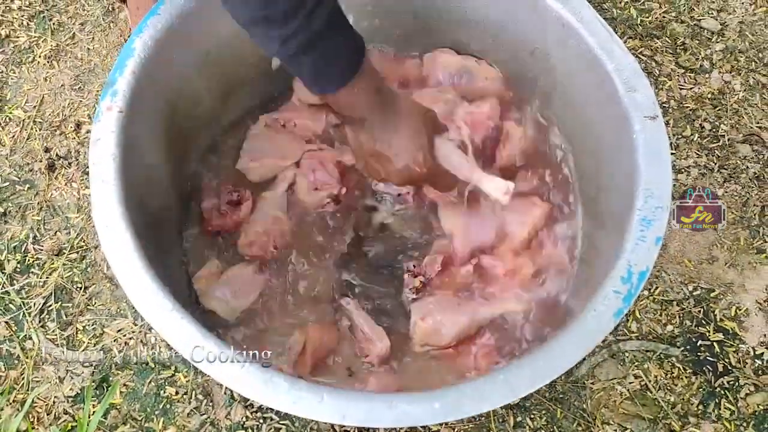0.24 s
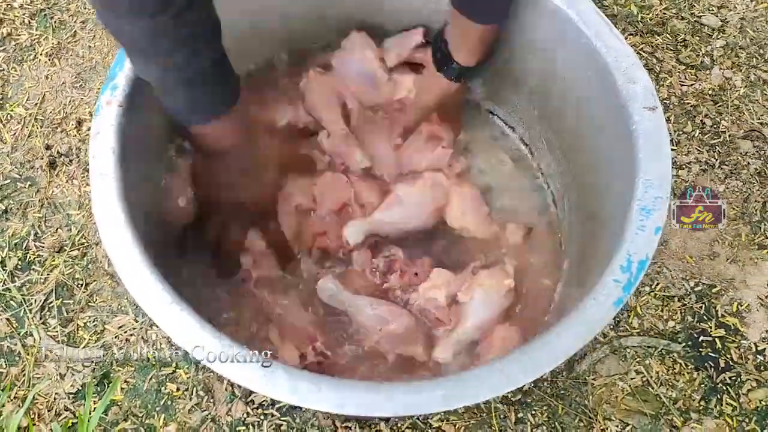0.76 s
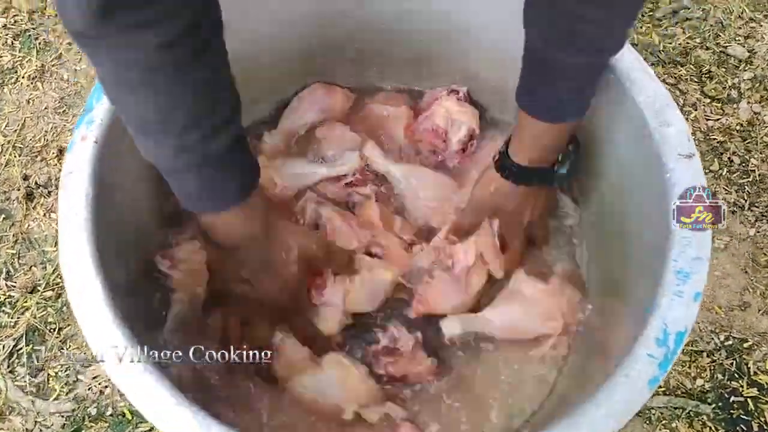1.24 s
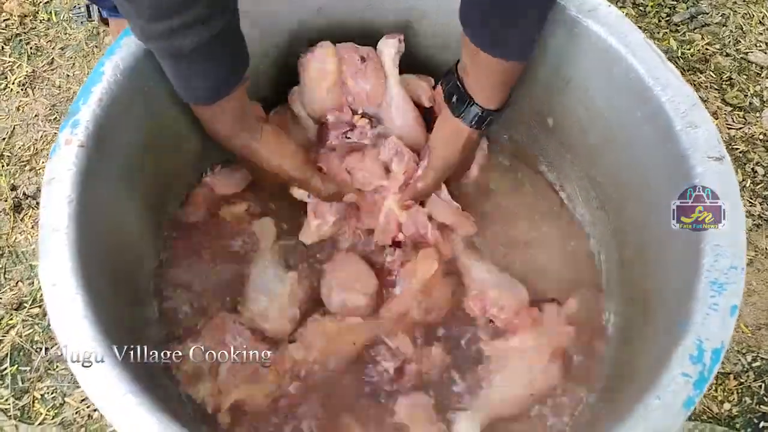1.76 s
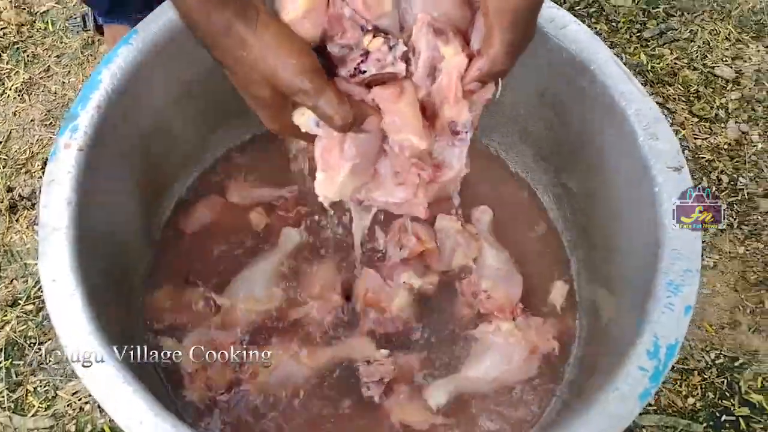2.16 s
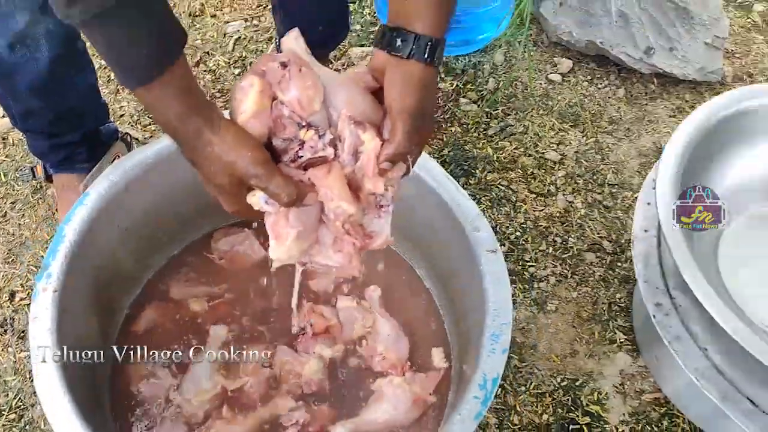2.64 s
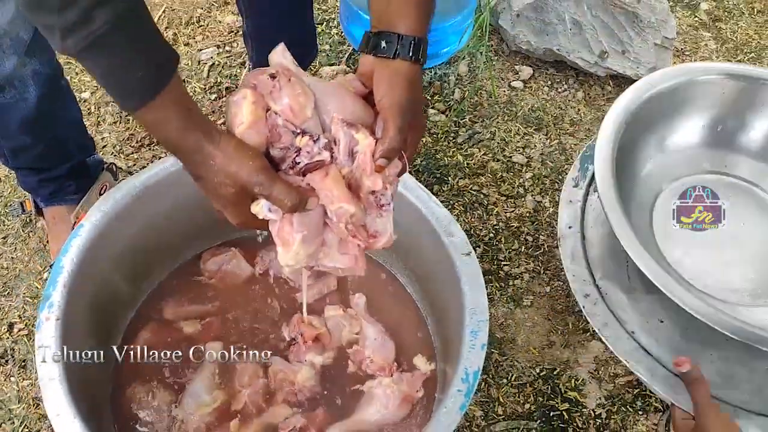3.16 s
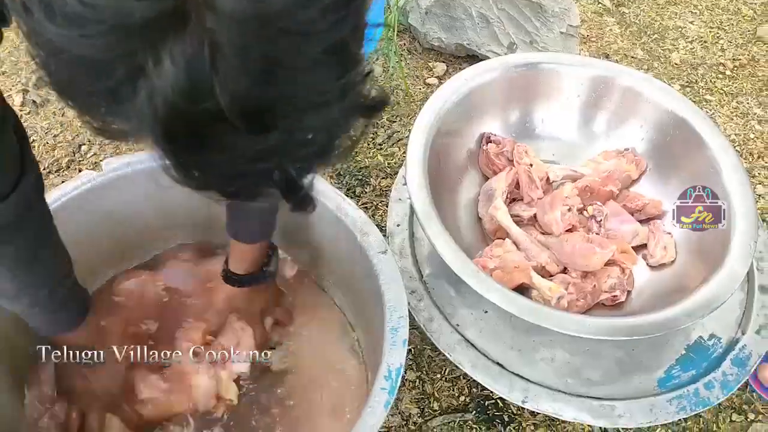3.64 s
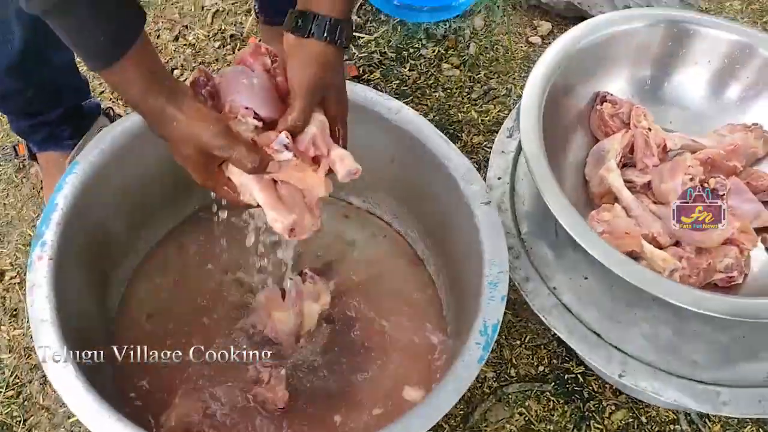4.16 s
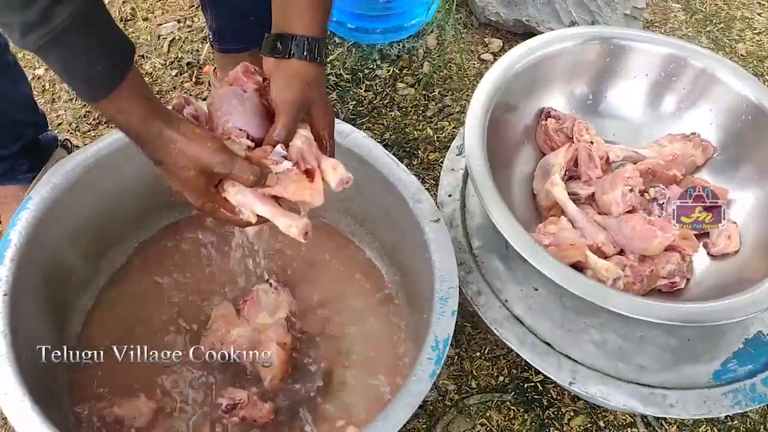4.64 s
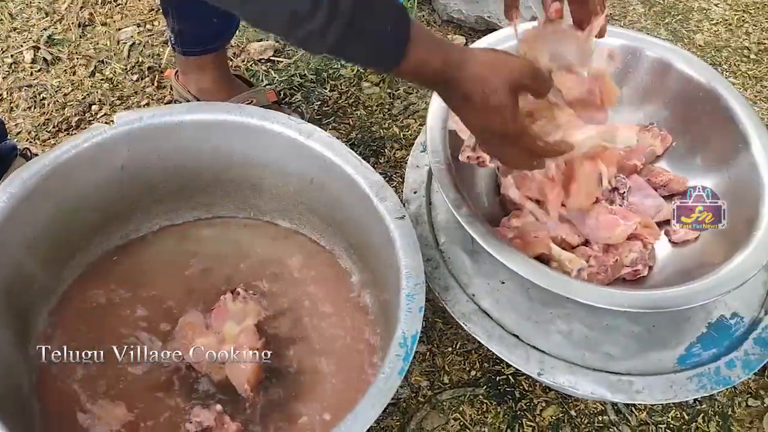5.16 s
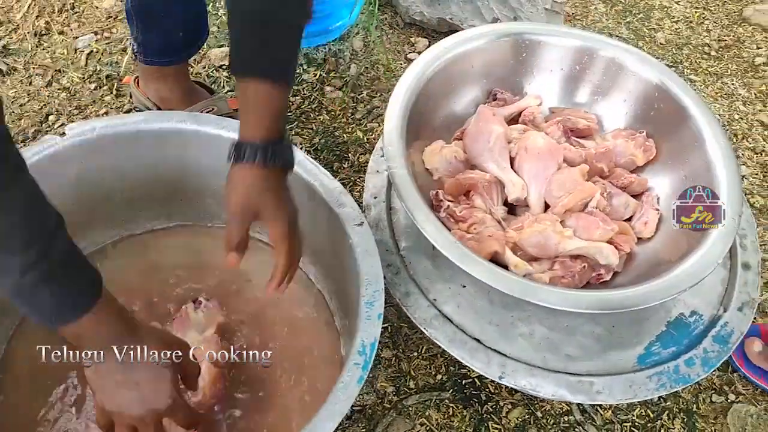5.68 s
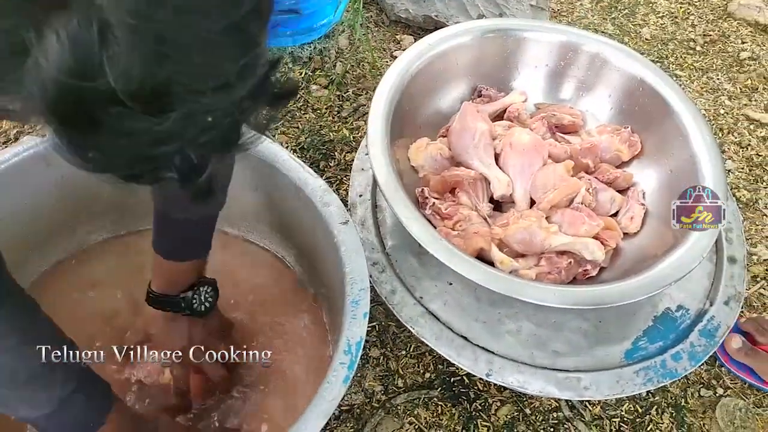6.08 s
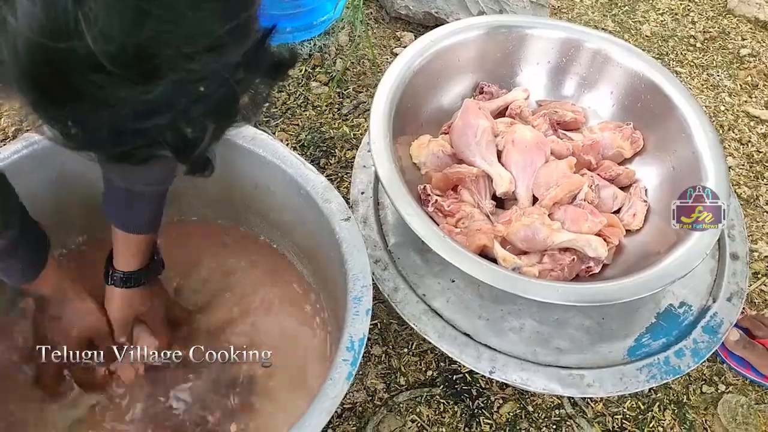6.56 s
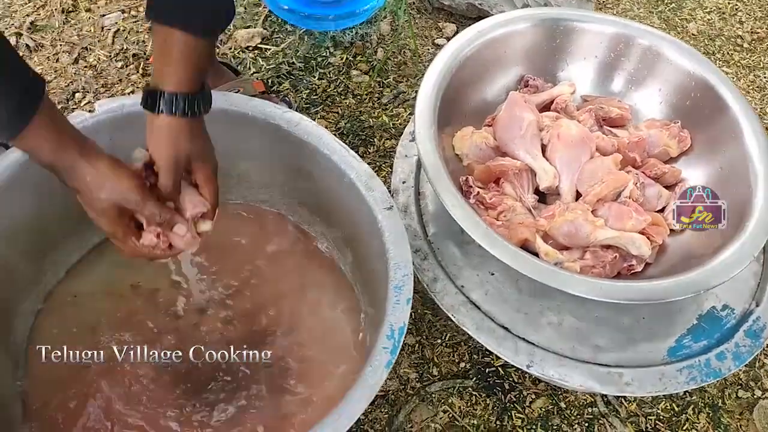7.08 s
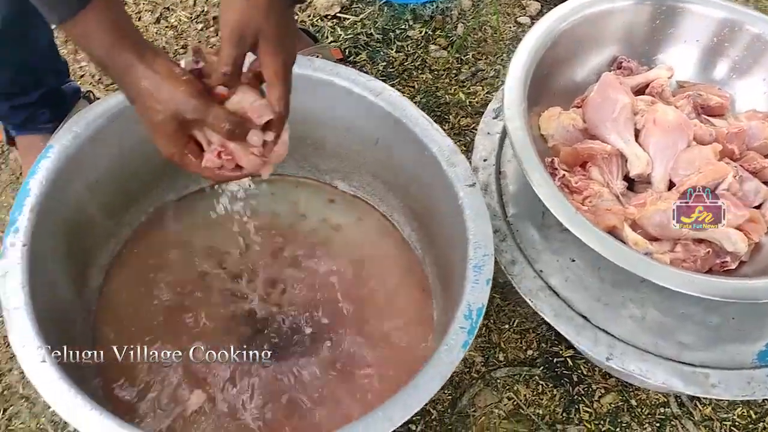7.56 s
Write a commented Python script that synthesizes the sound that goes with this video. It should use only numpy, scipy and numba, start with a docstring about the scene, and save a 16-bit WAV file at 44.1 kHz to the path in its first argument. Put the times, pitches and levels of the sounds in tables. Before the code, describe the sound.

Close up outdoors, hands churn chicken pieces in a wide metal pot of water: gulps, gurgles, splashes and wet squelches. Dripping handfuls are lifted, and a load lands very softly in a steel basin. The water quiets to small drips while a small engine drones faintly far away. Finally, water gushing off a lifted handful drums hollowly on the pot.

```python
"""Outdoors, by a wide metal pot of water: chicken pieces are stirred, squeezed and lifted by hand, close to a phone.
Swarms of rising sine rings make the gulps, gurgles, fizz and spray; single rings make plops, hits and drips.
Short bursts squelch, water glides in smooth bands, the pot hums and a handful drops in a steel basin.
From 3.2 to 6.8 s multiples of a firing rate drone: a small engine far away, speeding up and changing gear.
Near the end gushes off a lifted handful drum on the bottom of the nearly empty pot, by random blows on resonances."""
import sys
import numpy as np
from scipy import signal
from scipy.fft import rfft, irfft
from scipy.io import wavfile
from scipy.ndimage import uniform_filter1d
from numba import njit

SR = 44100
rng = np.random.default_rng(int(sys.argv[2]) if len(sys.argv) > 2 else 0)


def store_pcm(level_fs):
    """Save levels as 16-bit WAV."""
    pcm = np.round(np.clip(level_fs, -1, 1) * 32767).astype(np.int16)
    wavfile.write(sys.argv[1], SR, np.atleast_2d(pcm).T)


N = 344421
T = np.arange(N) / SR

# Bubble and drop sizes. Each row: pitch in Hz, relative level in dB per Hz.
GULP_SIZES = [(225, 2.5), (280, 5.5), (350, -1.5), (490, -11.5)]
GURGLE_SIZES = [(470, 0), (620, 7.5), (800, 1.5), (1050, 7.5), (1250, -6)]
FIZZ_SIZES = [(1200, 1.5), (1450, -1), (1850, 4), (2300, 4.5), (3000, -4.5)]
SPRAY_SIZES = [(2900, 5.5), (3500, 6), (4300, 0.5), (5200, 3), (6400, 11), (7400, 9), (8200, -59.5)]
# Tiniest bubbles of the froth. Each row: pitch in Hz, relative level in dB per Hz.
FROTH_SIZES = [(5600, -12), (6600, 4.5), (7600, -2)]
# Stray drops that ping on the surface. Each row: pitch in Hz, relative level in dB per Hz.
DROP_SIZES = [(1350, -8), (2500, 2.5), (5200, -0.5), (7200, -11)]
# Droplets falling back. Each row: pitch in Hz, relative level in dB per Hz.
TICK_SIZES = [(900, 0.5), (1800, 1), (3200, -3.5), (5000, -9.5)]
# Stream breaking up where it lands. Each row: pitch in Hz, relative level in dB per Hz.
RUSH_SIZES = [(350, 4.5), (800, 10.5), (1100, -2), (1500, -4.5), (2700, -1), (4300, -16.5), (6500, -28.5),
              (8000, -37)]

# Water thrown about by a hand or spilling off the meat. Each row: start in seconds, length in seconds,
# relative level in dB, depth in dB (large bubbles over small), gulp level in dB relative to the slosh.
SLOSHES = [(0.0, 0.1, -59, 2, 10.5), (0.1, 0.15, -56, 1, 1), (0.26, 0.07, -66.5, -1.5, -0.5),
           (0.473, 0.039, -58, -17.5, -19), (0.556, 0.028, -62.5, 11, -20), (0.662, 0.24, -64, 11, -14),
           (0.94, 0.15, -61.5, 9.5, 4.5), (1.159, 0.044, -60.5, 10.5, 1), (1.23, 0.048, -61.5, -12, -15),
           (1.351, 0.024, -59, -1.5, -15), (1.49, 0.044, -58.5, -1, -35), (1.772, .2, -58.5, 2, -4.5),
           (2.021, 0.52, -62, -1.5, -18), (2.276, 0.06, -54, 10, -11.5), (2.337, 0.24, -57, 7.5, -1.5),
           (2.596, 0.097, -58.5, 5, -2.5), (2.695, 0.12, -62, 7.5, 3), (2.828, 0.19, -55.5, 4.5, -12),
           (3.007, 0.063, -54, -3, -0.5), (3.153, 0.15, -56, -5.5, -10.5), (3.201, 0.013, -52.5, 1, -17),
           (3.335, 0.021, -68, 13, 9), (3.576, 0.1, -58.5, 2.5, -6.5), (3.693, 0.11, -57.5, 7, -4),
           (3.818, 0.17, -57, 3, 3.5), (4.084, 0.18, -60.5, 3.5, 6.5), (4.329, 0.06, -64.5, 12.5, 6),
           (4.495, 0.17, -68, 9, 6), (4.574, 0.11, -58, 4, -19), (4.667, 0.079, -54, 5.5, -1.5),
           (4.866, 0.093, -67, -10.5, -9), (5.166, .12, -65, 1, -7.5), (5.459, 0.041, -65.5, -5, -3),
           (5.744, 0.17, -65, -3.5, -11), (5.817, 0.018, -66, 12.5, -4), (6.035, 0.17, -72.5, 9, -4.5),
           (6.24, 0.11, -67, 3, -12), (6.57, 0.024, -65.5, -22.5, -11), (6.764, 0.032, -68, -26, -20.5),
           (6.947, 0.034, -59, 0, 0)]
SLOSH_ATTACK_S, SLOSH_SAG_DB_PER_S, SLOSH_RELEASE_S = 0.004, 14, 0.02
# Shift of the fizz and the spray, in dB per dB of depth.
FIZZ_PER_DEPTH, SPRAY_PER_DEPTH = 0.12, -0.25
# Restless surface between sloshes. Each row: time in seconds, relative level in dB, depth in dB.
RIPPLE = [(0, -57, 10), (.44, -69.5, -10), (.6, -65.5, 6.5), (1.0, -58, -1.5), (1.14, -68.5, 7),
          (1.4, -63.5, -3.5), (1.599, -67.5, -0.5), (1.732, -69, -3.5), (2.299, -68, 6.5), (3.1, -62.5, -5),
          (3.39, -78.5, 1.5), (3.55, -65, -8.5), (3.699, -73.5, 4), (4.45, -68.5, 4.5), (5.03, -69, -1.5),
          (5.11, -75.5, 1), (5.3, -72.5, 0), (5.62, -75, -9.5), (5.95, -68.5, -8.5), (6.36, -71, -10.5),
          (6.48, -73.5, -2), (6.64, -81, -12.5), (6.879, -76, -14.5), (7.8, -60, 3)]
RIPPLE_GULP_DB = -21
# Sheets of water folding over. Each row: start in seconds, length in seconds, relative level in dB,
# first pitch in Hz, last pitch in Hz.
WASHES = [(0.027, 0.033, -46.5, 450, 976), (0.104, 0.063, -43.5, 600, 1092), (0.104, 0.03, -48, 1600, 1926),
          (0.15, 0.091, -51.5, 478.5, 404), (0.958, 0.099, -52.5, 550, 1048), (2.281, 0.069, -48, 702, 962),
          (2.309, 0.16, -53, 1910, 2200), (2.374, 0.1, -54.5, 850, 1210), (2.503, 0.079, -48.5, 598, 790),
          (2.704, 0.025, -42, 822, 930), (2.837, 0.11, -52, 950, 1040), (3.693, 0.1, -49.5, 1305, 845),
          (5.82, 0.059, -60, 1050, 849), (4.666, 0.079, -44, 998, 683)]
WASH_ATTACK_S, WASH_SAG_DB_PER_S, WASH_RELEASE_S = 0.004, 41.5, 0.013
# Single bubbles closing, and last the low boom of the final gush landing. Each row: start in seconds, relative
# level in dB, pitch in Hz.
PLOPS = [(0.035, -29.5, 407), (0.056, -36.5, 492), (.058, -35, 1230), (.104, -39, 557), (.177, -28, 3180),
         (.182, -40.5, 544), (.212, -44, 1080), (.237, -37.5, 1205), (.569, -39.5, 774), (0.572, -33, 1210),
         (.695, -25.5, 631), (.875, -43, 750), (.965, -38.5, 538), (1.017, -35.5, 716), (1.052, -31, 1124),
         (1.186, -30.5, 888), (1.356, -36, 1110), (1.498, -40.5, 750), (1.547, -40, 793), (1.609, -35, 669),
         (1.775, -32.5, 734), (1.775, -32, 1013), (1.926, -42, 864), (1.969, -40.5, 945),
         (2.278, -26.5, 721), (2.288, -38, 654), (2.288, -28.5, 2840), (2.31, -32.5, 746),
         (2.337, -36, 1935), (2.343, -32, 870), (2.378, -35, 800), (2.411, -33, 2180), (2.513, -40, 553),
         (2.559, -29, 642), (2.715, -15.5, 905), (2.801, -43.5, 555), (2.845, -32, 950),
         (2.892, -33.5, 594), (2.943, -31.5, 1150), (3.014, -35.5, 1840), (3.041, -38.5, 550),
         (3.089, -32, 2110), (3.346, -35.5, 1130), (3.596, -38.5, 705), (3.63, -40.5, 2080),
         (3.702, -28, 1090), (3.702, -37, 616), (3.752, -32, 933), (3.752, -30, 1540), (3.811, -38, 820),
         (3.966, -32, 1080), (4.073, -41, 800), (4.15, -39, 758), (4.19, -28.5, 988), (4.3, -35.5, 3136),
         (4.331, -35, 700), (4.362, -35, 2820), (4.606, -38, 621), (4.684, -32, 910), (4.732, -38.5, 781),
         (5.036, -51, 853), (5.177, -32, 621), (5.184, -41, 1152), (5.248, -51, 547), (5.338, -49, 1090),
         (5.4, -47, 1186), (5.464, -51.5, 947), (5.481, -56, 1172), (5.502, -53, 1060),
         (5.609, -56.5, 1028), (5.701, -49, 1980), (5.728, -50, 1370), (5.81, -32.5, 4800),
         (5.822, -40.5, 961), (5.884, -52, 749), (5.963, -45.5, 2603), (5.982, -51.5, 1090),
         (6.039, -43.5, 691), (6.072, -42.5, 580), (6.088, -44, 2900), (6.103, -45, 590), (6.145, -55, 850),
         (6.168, -45.5, 750), (6.2, -39.5, 4290), (6.23, -56, 524), (6.249, -41, 3720), (6.256, -57, 1060),
         (6.309, -58, 810), (6.318, -49.5, 563), (6.321, -48, 1110), (6.344, -46.5, 1070),
         (6.465, -52.5, 934), (6.591, -59, 1717), (6.597, -56, 960), (6.704, -44.5, 4085),
         (6.786, -57, 3150), (7.789, -22, 269)]
PLOP_CYCLES = 2.1  # swell time in cycles, so large bubbles last longer
# In calm water: extra swell cycles, and the gurgle level at which half of them are added.
CALM_CYCLES, CALM_DB = 5.5, -77
# Short hard-edged hits and drips on the water. Each row: start in seconds, relative level in dB, pitch in Hz.
HITS = [(1.775, -28.5, 870), (2.279, -33.5, 1100), (3.151, -37, 4500), (3.583, -37, 1680),
        (3.686, -42, 750), (3.74, -41, 912), (3.809, -44, 1300), (4.189, -39.5, 1410), (4.329, -32.5, 960),
        (4.543, -38, 2100), (5.232, -43, 1560), (5.273, -43, 1490), (5.681, -45, 5000), (6.041, -53, 1212),
        (6.074, -48, 1402), (6.09, -46, 1910), (6.107, -53, 1390), (6.288, -47, 2440), (6.309, -45, 1600),
        (6.345, -44, 2316), (6.534, -39, 5000), (6.968, -33, 1300), (7.247, -31.5, 1100)]
# Wet meat squeezed or slapped. Each row: start in seconds, relative level in dB,
# lower spatter in dB relative to that, swell time in ms (raised to 0.3 if shorter).
SQUELCHES = [(0.115, -45.5, 6.5, 4.1), (.469, -45.5, -5.5, 8.8), (0.566, -57.5, 15.5, 2.3),
             (0.694, -39.5, -3, 1.6), (.753, -45, -0.5, 2.2), (0.799, -43, 0, 2.2), (0.963, -40.5, -7, 2.3),
             (1.013, -47, 9, 2.8), (1.232, -44.5, -11, 2.3), (1.353, -42, -3.5, 2.2),
             (1.472, -40.5, -12, 3.5), (1.493, -35.5, -5.5, 3.1), (1.752, -39.5, -7, 1.15),
             (2.278, -43, 1, 1.1), (2.549, -37, -8, 2.4), (2.679, -37.5, -13, 1.6), (2.773, -40, -19, 2.1),
             (2.945, -36.5, -4.5, 6.6), (3.149, -41, -10, 8.7), (3.214, -33, -3, 3.9),
             (3.232, -32.5, -2, 2), (3.339, -47, 0.5, 7.8), (3.672, -44.5, -10, 3.6), (3.741, -60, 16, 5.9),
             (4.082, -50, -20, 2.9), (4.189, -40.5, -8, 2.1), (4.277, -48.5, -1, 2.9),
             (4.359, -49.5, 5, 3.9), (4.499, -44, -23, 2.7), (4.54, -44, 2.5, 5.2),
             (4.683, -27.5, -18, 1.8), (4.702, -44, 3.5, 4.9), (5.679, -47.5, -15, 2.7),
             (5.807, -44, -34, 2.9), (5.915, -47.5, -18, 1.4), (6.044, -48, -24, 1.94),
             (6.069, -45.5, -11, 1.9), (6.282, -46, -17, 2.8), (6.343, -50, -1, 1.8),
             (6.532, -36.5, -36, 0.26), (6.673, -47.5, -36, 1.43), (6.705, -47.5, -21, 2.6),
             (7.416, -44.5, 2.5, 9.6), (7.601, -40, 0, 4.9)]
# Air in the pot above the water. Each row: frequency in Hz, width in Hz, level in dB.
HOLLOW = [(546, 8.9, 2), (621, 5.3, 0.5), (821, 64, 0), (993, 5.9, 4.5), (1620, 120, -3)]

# Gushes falling on the pot's bottom. Each row: start in seconds, length in seconds,
# relative boom of the bottom in dB, relative clang of the wall in dB.
GUSHES = [(6.967, 0.065, -27, -36), (7.245, 0.24, -24, -32), (7.436, 0.12, -28, -37),
          (7.586, 0.17, -30.5, -36), (7.781, 0.034, -50, -32)]
GUSH_ATTACK_S, GUSH_SAG_DB_PER_S, GUSH_RELEASE_S = 0.001, 20, 0.036
# Dribble after each gush: release, and levels relative to the gush.
DRIBBLE_RELEASE_S, DRIBBLE_BOOM_DB, DRIBBLE_CLANG_DB = 0.12, -5.5, -1.5
# Wet bottom of the pot. Each row: frequency in Hz, width in Hz, relative level in dB.
BOTTOM = [(125.7, 15, -7), (149.7, 18, 1.5), (169, 8.8, -0.5), (192.2, 8.6, 8.5), (230.2, 11.7, 4.5),
          (252.5, 10, -1.5), (292.6, 13, -7), (334, 12, -6.5), (357, 11, -9.5), (386, 8.4, -11.5)]
# Wall of the pot. Each row: frequency in Hz, width in Hz, relative level in dB.
WALL = [(453, 7.9, -5), (468, 13, 3), (536, 7.4, -3.5), (596, 10, -7), (652, 22, 4), (712, 23, -1),
        (762, 12.4, 6.5), (781, 13.5, 5.5), (850, 14, 5), (932, 55, -2.5), (1730, 54, -11.5),
        (1894, 25, -11), (2354, 77, -17), (2660, 51, -14), (3410, 60, -24.5)]
# Heavy lumps in the gushes. Each row: start in seconds, level in dB.
THUMPS = [(6.976, -31), (7.006, -26), (7.256, -25.5), (7.322, -22), (7.348, -22), (7.38, -21.5),
          (7.466, -26.5), (7.6, -31), (7.716, -33)]
# Spells in which the water rocks the pot. Each row: start in seconds, length in seconds, relative level in dB.
SWAYS = [(0.0, 0.033, -58), (0.208, 0.078, -59.5), (1.742, 0.15, -62.5), (6.892, 0.05, -52.5)]
SWAY_ATTACK_S, SWAY_SAG_DB_PER_S, SWAY_RELEASE_S = 0.045, 8, 0.073
# The fuller pot swayed gently. Each row: frequency in Hz, width in Hz, relative level in dB.
SWAY_MODES = [(113, 11, -0.5), (139.3, 17, -1.5), (148.7, 8.5, 6), (180, 7.2, 1), (214, 11, -2),
              (298, 11, -16)]
# The handful landing in the steel basin. Each row: start in seconds, level in dB.
LANDINGS = [(5.18, -51), (5.25, -57), (5.345, -64)]
# Basin damped by its load. Each row: frequency in Hz, width in Hz, relative level in dB.
BASIN = [(368, 7, -5), (515, 7.8, -3), (588, 8.7, 5), (656, 5.3, -2)]

# Small engine far off. Each row: time in seconds, firings per second, level in dB,
# pitch of its loudest drone in Hz.
ENGINE = [(3.2, 27, -78, 150), (3.27, 31.5, -58, 165), (3.38, 28.6, -55.5, 161), (3.56, 35, -67.5, 160),
          (3.65, 35.7, -61, 169), (3.8, 37, -54, 178), (3.86, 34, -63, 340), (3.94, 37.3, -59, 335),
          (3.99, 38.6, -55, 119), (4.08, 40, -48.5, 119), (4.18, 44, -51, 173), (4.21, 29.5, -52.5, 170),
          (4.26, 29.6, -49, 118), (4.38, 28.5, -51, 115), (4.48, 27.2, -55, 181), (4.7, 31, -55, 121.6),
          (4.87, 29, -58.5, 214), (5.0, 27.3, -66, 171), (5.1, 27, -54.5, 142), (5.361, 28, -55.5, 150),
          (5.49, 32, -60.5, 147), (5.529, 32, -64, 288), (5.63, 32.2, -61, 290.7), (5.7, 29.5, -75, 200),
          (5.79, 28, -60.5, 167), (5.87, 26.5, -60.5, 115), (5.99, 28.3, -68, 125), (6.08, 26, -55.5, 147),
          (6.2, 23.8, -62, 130), (6.26, 24.5, -60, 123), (6.359, 24.2, -50.5, 138.2),
          (6.5, 24.4, -57.5, 122), (6.64, 22.7, -58.5, 125.5), (6.781, 24.7, -76, 122)]
# Its exhaust from this far. Each row: frequency in Hz, relative level in dB.
EXHAUST = [(70, -13.5), (95, -4), (120, 0), (170, -1.5), (205, -4), (245, -10.5), (295, -15.5),
           (350, -25.5), (430, -35), (600, -37)]
CRUISE_FIRINGS_PER_S = 26  # above this rate the exhaust brightens
EXHAUST_CENTRE_HZ = 150
# Still outdoor air. Each row: frequency in Hz, relative level in dB per Hz.
AIR = [(20, 1), (45, 14.5), (100, 17), (250, 3.5), (600, -58.5), (1500, -44), (4000, -22.5), (6500, -4),
       (8200, -13.5)]
AIR_DB = -75.5

# Colour of the left microphone port against the right. Each row: frequency in Hz, level in dB.
PORT_BALANCE = [(60, 0), (310, 0.3), (530, 0.7), (1000, 0.6), (1570, 1.5), (2500, 3.5), (4400, -1),
                (7500, -1)]
PORT_LAG_MS, LAG_SPREAD_MS = 0.16, 0.1
TOP_HZ = 8100


def undb(db):
    """Decibels to gain."""
    return 10 ** (np.asarray(db) / 20)


def colour(hz, points):
    """Gain at the given frequencies, interpolated in dB over log frequency."""
    f, db = np.transpose(points)
    return undb(np.interp(np.log(hz), np.log(f), db))


def smooth(x, span_s):
    """Moving average, applied twice."""
    size = max(int(span_s * SR), 8)
    return uniform_filter1d(uniform_filter1d(x, size), size)


def steady(x, span_s):
    """Unit level over each span; faster detail is kept."""
    power = np.atleast_2d(x).mean(axis=0) ** 2
    return x / np.sqrt(np.abs(smooth(power, span_s)) + 1e-4 * power.mean())


def waver(span_s):
    """Slow chance with a spread of 1."""
    x = smooth(rng.standard_normal(N), span_s)
    return x / x.std()


def band(x, low_hz, high_hz):
    """Second-order band-pass."""
    return signal.sosfilt(signal.butter(2, [low_hz, high_hz], "band", fs=SR, output="sos"), x)


def stereo_noise(apart_hz):
    """Noise spectra, nearly alike at both ports in the bass and unrelated in the treble."""
    hz = np.arange(N // 2 + 1) * SR / N + 1
    mid, side = rfft(rng.standard_normal((2, N)))
    width = np.maximum(hz / np.hypot(hz, apart_hz), .15)
    return hz, (mid + np.array([[1], [-1]]) * width * side) / np.sqrt(1 + width ** 2)


def resonate(x, modes, order=-1):
    """Sum of two-pole resonances: neighbours in opposite phase (-1), or in phase with deep valleys between (1)."""
    out = 0
    for k, (hz, width_hz, db) in enumerate(modes):
        peak = signal.iirpeak(hz, hz / width_hz, fs=SR)
        out = out + order ** k * undb(db) * signal.lfilter(*peak, x)
    return out


def surge(at, length_s, attack_s, sag_db_per_s, release_s):
    """Envelope of moving water: it builds up, sags while it lasts and dies away."""
    t = np.maximum(T - at, 0)
    sag = sag_db_per_s * np.minimum(t, length_s) * np.log(10) / 20
    fall = sag + np.maximum(t - length_s, 0) / release_s
    return np.minimum(t / attack_s, 1) * np.exp(-np.minimum(fall, 20))


def together(envelopes, db):
    """Level of overlapping surges, each at its own strength: their powers add."""
    return np.sqrt(undb(db) ** 2 @ np.square(envelopes))


@njit
def rings(at, hz, swell, size, glide, neck):
    """Each bubble swells and rings out; a positive glide raises its pitch as it nears the surface."""
    out = np.zeros(N)
    for k in range(len(at)):
        first = max(int(at[k] * SR) + 1, 0)
        last = min(int((at[k] + 8 * swell[k]) * SR), N)
        for i in range(first, last):
            t = i / SR - at[k]
            u = t / swell[k]
            level = size[k] * min(t * hz[k] / neck, 1.) * u * np.exp(1 - u)
            out[i] += level * np.sin(2 * np.pi * hz[k] * t * (1 + glide * (u - 3) / 2))
    return out


def bubbles(at, hz, swell_s, size, glide, neck_cycles=0.36):
    """Bubbles pinch off within neck_cycles; on average they reach the left port a little later than the right."""
    lag_s = (PORT_LAG_MS + LAG_SPREAD_MS * rng.standard_normal(len(at))) / 1000
    return np.array([rings(at + side * lag_s / 2, hz * 1., swell_s * 1., size * 1.,
                           float(glide), float(neck_cycles)) for side in (1, -1)])


def swarm(sizes, per_s, cycles, scatter_db, glide, span_s):
    """Dense run of bubbles: a few stand out if scatter_db is positive, a few are faint if negative."""
    when, pitch, life, strength, sign = rng.random((int(per_s * N / SR), 5)).T
    hz = sizes[0][0] * (sizes[-1][0] / sizes[0][0]) ** pitch
    scatter = undb(-scatter_db * np.log(1 - strength)) * np.sign(sign - .5)
    size = colour(hz, sizes) * hz * scatter
    swell_s = cycles * (.5 + life) / hz
    return steady(bubbles(when * N / SR, hz, swell_s, size, glide), span_s)


def impacts(per_s, scatter_db):
    """Lumps of water landing at random moments."""
    landed = rng.random(N) < per_s / SR
    return landed * undb(scatter_db * rng.standard_normal(N)) * rng.choice([-1, 1], N)


def struck(blows, modes, low_hz, soft_hz):
    """Soft, drawn-out blows on metal: each rings the same modes at its own strength."""
    ring = resonate(signal.unit_impulse(SR), modes, order=1)
    ring = band(ring, min(low_hz, .8 * soft_hz), soft_hz)
    pushes = np.zeros(N)
    for at, db in blows:
        pushes[int(at * SR)] += undb(db)
    return signal.fftconvolve(pushes, ring / np.abs(ring).max())[:N]


def agitation():
    """Levels of gulps, gurgle, fizz and spray: a deep slosh traps large bubbles, a shallow one throws spray."""
    shapes = [surge(at, length_s, SLOSH_ATTACK_S, SLOSH_SAG_DB_PER_S, SLOSH_RELEASE_S)
              for at, length_s, *_ in SLOSHES]
    _, _, db, depth_db, gulp_db = np.transpose(SLOSHES)
    s, *columns = np.transpose(RIPPLE)
    ripple_db, ripple_depth_db = (np.interp(T, s, c) for c in columns)
    gulp_ripple = undb(ripple_db + ripple_depth_db + RIPPLE_GULP_DB)
    levels = [np.hypot(together(shapes, db + gulp_db), gulp_ripple)]
    for per_depth in (1, FIZZ_PER_DEPTH, SPRAY_PER_DEPTH):
        sloshing = together(shapes, db + per_depth * depth_db)
        levels.append(np.hypot(sloshing, undb(ripple_db + per_depth * ripple_depth_db)))
    return levels


def churning(deep, large, small, spray, deep_db=-1, large_db=1.87, small_db=-3, spray_db=1,
             clump_db=3.0, clump_s=0.011):
    """Hands stir up gulps, gurgles, fizz and spray; each little wave breaks into all sizes at once."""
    clumps = waver(clump_s)
    gulps = swarm(GULP_SIZES, per_s=170, cycles=1.21, scatter_db=3.5, glide=0.017, span_s=0.037)
    gurgle = swarm(GURGLE_SIZES, per_s=620, cycles=3.97, scatter_db=3.5, glide=0.022, span_s=0.016)
    fizz = swarm(FIZZ_SIZES, per_s=2200, cycles=3.2, scatter_db=3.0, glide=0.01, span_s=0.11)
    mist = swarm(SPRAY_SIZES, per_s=7000, cycles=3, scatter_db=3.3, glide=.004, span_s=.025)
    water = undb(deep_db) * deep * gulps + undb(large_db) * large * gurgle
    water = water + undb(small_db) * small * fizz + undb(spray_db) * spray * mist
    return water * undb(clump_db * clumps)


def plops(gurgle, gain_db=-2.0, glide=0.013):
    """Air pockets pinch off under the hands with a plop; in calm water they ring longer. The last one is
    instead a lump of the final gush booming low on the pot."""
    at, db, hz = np.transpose(PLOPS)
    calm = 1 / (1 + (np.interp(at, T, gurgle) / undb(CALM_DB)) ** 2)
    swell_s = (PLOP_CYCLES + CALM_CYCLES * calm) / hz
    return bubbles(at, hz, swell_s, undb(db + gain_db), glide, neck_cycles=1.82)


def squelches(spray_db=-3.5, spatter_db=-6):
    """Short bursts of crackle as films of water tear between skin and meat."""
    fine, coarse = np.zeros(N), np.zeros(N)
    for at, db, lower_db, swell_ms in SQUELCHES:
        span = slice(int(at * SR), min(int(at * SR) + SR // 10, N))
        u = np.maximum(T[span] - at, 0) * 1000 / max(swell_ms, .3)
        burst = undb(db) * u * np.exp(1 - u)
        fine[span] += burst
        coarse[span] += burst * undb(lower_db)
    spray = swarm(SPRAY_SIZES, per_s=15000, cycles=5.6, scatter_db=-2.0, glide=0.015, span_s=0.0054)
    spatter = swarm(FIZZ_SIZES, per_s=3600, cycles=1.0, scatter_db=-3.0, glide=0.016, span_s=0.0028)
    return undb(spray_db) * fine * spray + undb(spatter_db) * coarse * spatter


def washes(gain_db=-4.0, width_hz=330):
    """Countless bubbles merge into one smooth band that glides as the sheet of water closes."""
    hz, noise = stereo_noise(apart_hz=600)
    low_noise = irfft(noise / (1 + (hz / (width_hz / 2)) ** 4) ** .5, N)
    low_noise = low_noise / low_noise.std()
    carrier = 0
    for at, length_s, db, first_hz, last_hz in WASHES:
        glide_hz = np.interp(T, [at, at + length_s], [first_hz, last_hz])
        phase = 2 * np.pi * np.cumsum(glide_hz) / SR
        level = undb(db) * surge(at, length_s, WASH_ATTACK_S, WASH_SAG_DB_PER_S, WASH_RELEASE_S)
        carrier = carrier + level * np.exp(1j * phase)
    # the analytic signal shifts the noise up to the gliding pitch
    return undb(gain_db) * np.real(carrier * signal.hilbert(low_noise))


def hits_and_drips(cycles=0.82, glide=0.01):
    """A short hard-edged hit or drip on the water starts at once and is over in a few cycles."""
    at, db, hz = np.transpose(HITS)
    return bubbles(at, hz, cycles / hz, undb(db), glide, neck_cycles=0.1)


def stray_drops(small, gain_db=-67, follow=0.81):
    """Drops fall from hands and meat; they fade less than the fizz does, so they stand out in the lulls."""
    drops = swarm(DROP_SIZES, per_s=110, cycles=5, scatter_db=3, glide=.018, span_s=.12)
    return undb(gain_db) * (small / small.mean()) ** follow * drops


def splatter(large, small, gain_db=-7.0):
    """Stirred water throws droplets that tick as they fall back."""
    ticks = swarm(TICK_SIZES, per_s=600, cycles=0.8, scatter_db=3.5, glide=0, span_s=0.08)
    return undb(gain_db) * np.sqrt(large * small) * ticks


def seething(spray, gain_db=-70, follow=0.44):
    """The finest bubbles burst in the froth, fading less than the spray as the hands pass."""
    froth = swarm(FROTH_SIZES, per_s=900, cycles=4, scatter_db=4, glide=.004, span_s=.08)
    return undb(gain_db) * (spray / spray.mean()) ** follow * froth


def hollow(water, gain_db=-6):
    """Every splash makes the air in the pot ring on for a moment."""
    return water + undb(gain_db) * resonate(water, HOLLOW)


def drumming(boom_db=-3.0, clang_db=-7.0, rush_db=-13, splash_db=-22, soft_hz=350, hard_hz=3200):
    """The stream beats on the pot: bottom booms, wall clangs, water rushes and splashes where it lands."""
    blows = impacts(per_s=700, scatter_db=3.5)
    boom = steady(band(resonate(blows, BOTTOM, order=1), 105, soft_hz), 0.11)
    clang = steady(band(resonate(blows, WALL), 330, hard_hz), 0.039)
    rush = swarm(RUSH_SIZES, per_s=2600, cycles=0.77, scatter_db=1.0, glide=0, span_s=0.019)
    splash = swarm(SPRAY_SIZES, per_s=8000, cycles=3, scatter_db=1.5, glide=0.005, span_s=0.1)
    gush, dribble = ([surge(at, length_s, GUSH_ATTACK_S, GUSH_SAG_DB_PER_S, release_s)
                      for at, length_s, *_ in GUSHES] for release_s in (GUSH_RELEASE_S, DRIBBLE_RELEASE_S))
    _, _, bottom_db, wall_db = np.transpose(GUSHES)
    low = np.maximum(together(gush, bottom_db), together(dribble, bottom_db + DRIBBLE_BOOM_DB))
    high = np.maximum(together(gush, wall_db), together(dribble, wall_db + DRIBBLE_CLANG_DB))
    bright = undb(clang_db) * clang + undb(rush_db) * rush + undb(splash_db) * splash
    return undb(boom_db) * low * boom + high * bright


def thumps(low_hz=175, soft_hz=255):
    """The heaviest lumps of a gush set the bottom booming; its close modes beat against each other."""
    return struck(THUMPS, BOTTOM, low_hz, soft_hz)


def rocking(gulps, gain_db=-1, gulp_db=-15, soft_hz=380):
    """Moving load and falling trickles push softly on the pot, which hums; deep gulps nudge it too."""
    push = band(impacts(per_s=120, scatter_db=3.0), 75, soft_hz)
    spells = [surge(at, length_s, SWAY_ATTACK_S, SWAY_SAG_DB_PER_S, SWAY_RELEASE_S)
              for at, length_s, _ in SWAYS]
    swaying = together(spells, [db for *_, db in SWAYS])
    level = np.hypot(undb(gain_db) * swaying, undb(gulp_db) * gulps)
    return level * steady(resonate(push, SWAY_MODES), 0.06)


def radiated(x, lowest_hz=60):
    """The pot is too small to give off the deepest bass."""
    return signal.sosfilt(signal.butter(2, lowest_hz, "high", fs=SR, output="sos"), x)


def pot_echo(x, t60_s=0.055, wet_db=-8, delay_s=0.00207, escape_hz=1100):
    """Short waves bounce between metal wall and water; long waves leave at once by the open top."""
    hz, noise = stereo_noise(apart_hz=1495)
    tail = irfft(noise * hz / np.hypot(hz, escape_hz), N)[:, :SR // 4]
    t = T[:SR // 4]
    tail = tail * (t > delay_s) * np.exp(-np.log(1000) * t / t60_s)
    tail = tail / np.sqrt(np.sum(tail ** 2) / 2)
    return x + undb(wet_db) * signal.fftconvolve(x, tail, axes=1)[:, :N]


def basin(low_hz=320, soft_hz=900):
    """Washed pieces drop on the pile and the basin rings faintly under them."""
    return struck(LANDINGS, BASIN, low_hz, soft_hz)


def far_engine(bright_db=1.0, rumble_db=-15, flutter_db=2.0, drone_db=12, drone_width_hz=13, fading_db=4.5):
    """Low multiples of the firing rate fade in and out over a soft rumble; one drones, revs lift the upper."""
    s, rate, db, drone = np.transpose(ENGINE)
    firing_hz = np.interp(T, s, rate) * (1 + .008 * waver(span_s=.05))
    phase = 2 * np.pi * np.cumsum(firing_hz) / SR
    drone_hz = np.interp(T, s, drone)
    revs = np.maximum(firing_hz - CRUISE_FIRINGS_PER_S, 0)
    tone, power = 0, 0
    for k in range(3, 13):
        hz = k * firing_hz
        lift = drone_db / (1 + ((hz - drone_hz) / drone_width_hz) ** 2)
        bright = bright_db * revs * np.log2(hz / EXHAUST_CENTRE_HZ)
        gain = colour(hz, EXHAUST) * undb(lift + bright + fading_db * waver(span_s=0.088))
        jitter = .3 * waver(span_s=0.051)
        tone = tone + gain * np.sin(k * phase + 2 * np.pi * rng.random() + jitter)
        power = power + gain ** 2 / 2
    hz, noise = stereo_noise(apart_hz=1200)
    rumble = irfft(noise * colour(hz, EXHAUST), N)
    level = undb(np.interp(T, s, db) + flutter_db * waver(span_s=0.021))
    level = np.where((T > s[0]) & (T < s[-1]), level, 0)
    return level * (tone / np.sqrt(power) + undb(rumble_db) * rumble / rumble.std())


def air():
    """A faint even hush of open ground: coloured noise."""
    hz, noise = stereo_noise(apart_hz=1200)
    x = irfft(noise * colour(hz, AIR), N)
    return undb(AIR_DB) * x / x.std()


def scene():
    """Water and metal sound together inside the pot, under the open air, with an engine far off."""
    deep, large, small, spray = agitation()
    water = churning(deep, large, small, spray) + plops(large) + squelches() + washes() + hits_and_drips()
    water = water + stray_drops(small) + splatter(large, small) + seething(spray)
    metal = radiated(drumming() + thumps() + rocking(deep))
    return pot_echo(hollow(water) + metal) + basin() + far_engine() + air()


def record(dry):
    """The two ports differ a little in colour; the phone cuts everything above TOP_HZ."""
    hz = np.arange(N // 2 + 1) * SR / N + 1
    ports = irfft(rfft(dry) * colour(hz, PORT_BALANCE) ** np.array([[.5], [-.5]]), N)
    return signal.sosfilt(signal.ellip(10, .2, 80, TOP_HZ, fs=SR, output="sos"), ports)


dry = scene()
out = record(dry)
store_pcm(out)
```